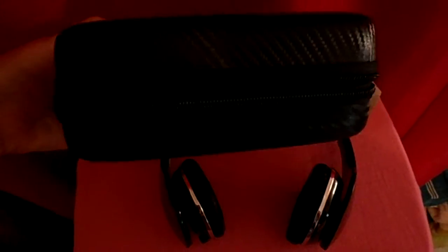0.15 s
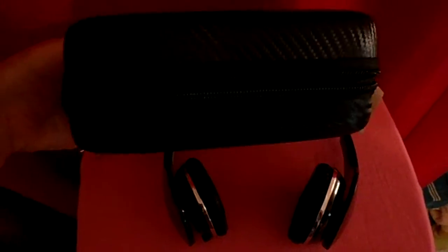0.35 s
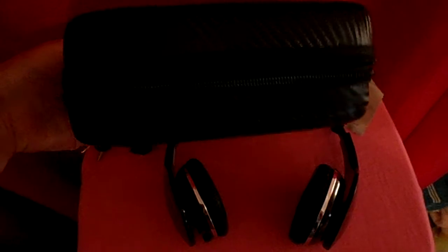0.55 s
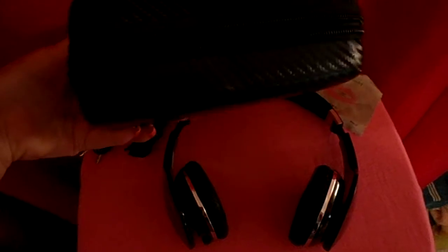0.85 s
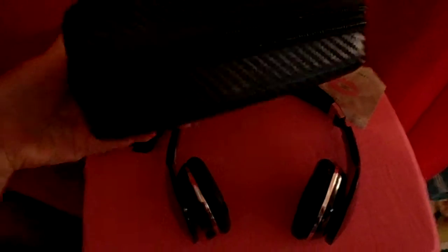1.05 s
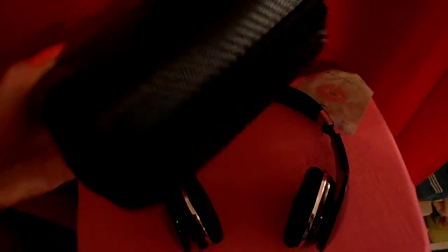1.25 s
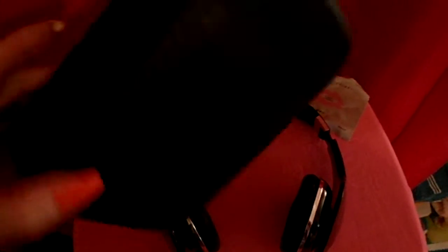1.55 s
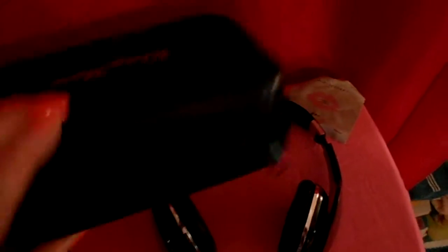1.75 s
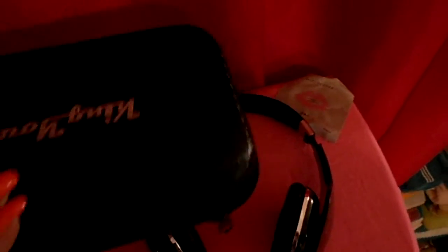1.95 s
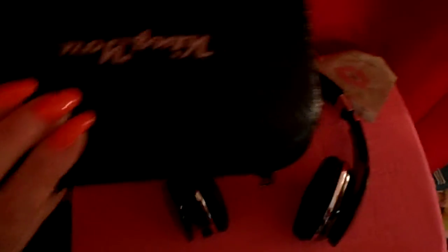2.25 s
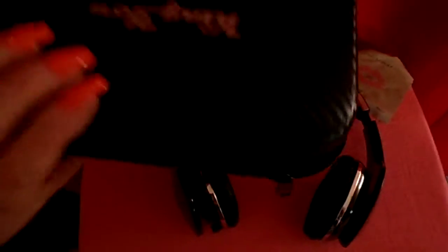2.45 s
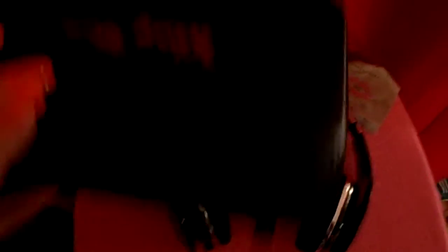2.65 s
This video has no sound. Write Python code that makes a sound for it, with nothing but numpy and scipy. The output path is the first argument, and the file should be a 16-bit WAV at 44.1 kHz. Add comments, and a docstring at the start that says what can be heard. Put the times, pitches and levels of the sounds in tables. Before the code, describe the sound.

A hard zippered case is handled close to the microphone: faint touches first, then a dense flurry of hollow knocks, clicks and a zipper jingle midway, thinning to sparse taps over low fan hum in a small room.

```python
"""Zippered case turned over in the hand

A hard-shell case is handled in a quiet room, over a low fan hum, rush and hiss (shaped noise, wavering
sines) and a faint pulsing electronic whine (gated tone plus its octave). Fingers rub the shell (noise
strokes, noise-driven modes) and knock it, and loose parts click (decaying modes plus noise bursts).
A metal zipper pull jingles (four damped sines); two soft low bumps are decaying sines.
"""
import sys
import numpy as np
from scipy import signal
from scipy.fft import rfft, irfft, next_fast_len
from scipy.io import wavfile
from scipy.ndimage import map_coordinates

SR = 44100
rng = np.random.default_rng(int(sys.argv[2]) if len(sys.argv) > 2 else 0)


def wav_record(signal):
    """Record a signal, one row per channel, as 16-bit PCM in the file named by sys.argv[1]."""
    frames = np.transpose(np.atleast_2d(signal))
    bounded = np.clip(frames, -1, 1)
    # unit amplitude maps onto the largest positive 16-bit level
    quanta = np.round(bounded * 32767).astype(np.int16)
    wavfile.write(sys.argv[1], SR, quanta)


N = 123479
TIME_S = np.arange(N) / SR
AGE_S = np.arange(SR // 3) / SR  # time since an event

# Room rush and hiss, relative spectrum: (frequency [Hz], density [dB per Hz])
AIR_SPECTRUM = [(15, -3), (35, -3), (80, -11.5), (130, -6.5), (190, -12.5), (290, -8), (460, -12),
                (650, -14.5), (850, -17.5), (1000, -11.5), (1150, -18.5), (1400, -20.5), (2000, -28.5),
                (3300, -31.5), (6000, -32.5), (10000, -32.5), (16000, -37)]
AIR_DB = -42.5
# Fan hum lines: (frequency [Hz], level [dB], width [Hz])
HUM_LINES = [(52.5, -53, 1.9), (120, -49, 1.24), (159.5, -62.5, 3), (236.2, -60.5, 1.75),
             (290.7, -61.5, 6.1)]
HUM_THROB_HZ, HUM_THROB_DB = 2.743, 2.5

WHINE_HZ, WHINE_DB, WHINE_OCTAVE_DB, WHINE_WAVER_DB = 7867, -58, -10, 1.5
WHINE_GATE_HZ, WHINE_GATE_CENTRE_S = 14.98, 0.0486
# Whine gate: (time [s], share of each cycle that it is on [0-1])
WHINE_DUTY = [(2.07, 0.6), (2.13, 0.74)]

# Soft low bumps of the hand: (time [s], level [dB])
BUMPS = [(2.40, -30.5), (2.462, -32)]
BUMP_HZ, BUMP_T60_S = 51.4, 0.14

# Fingers sliding on the shell:
# (start [s], length [s], hiss level [dB], hiss top [Hz], shell level [dB])
RUBS = [(0.016, 0.13, -56, 12000, -54), (1.163, 0.19, -48, 11000, -45.5), (1.423, .11, -38.5, 3980, -29.5),
        (1.666, 0.074, -60, 6000, -36.5), (1.714, 0.057, -41.5, 14000, -47),
        (1.857, 0.016, -41, 13400, -40), (1.872, .026, -44.5, 12000, -40),
        (1.976, 0.016, -42.5, 11000, -34.5), (2.087, 0.056, -36.5, 5100, -41.5),
        (2.273, 0.045, -47, 11000, -39.5)]
# Rub hiss spectrum: (frequency [Hz], gain [dB])
RUB_COLOUR = [(300, -28), (1200, -5), (2900, 3), (4200, -4), (6500, 2.5), (10000, 0.5), (13000, -6),
              (16000, -2.5)]
RUB_RISE_SHARE, RUB_ROUGH_DB = 0.17, 1.5

# Strikes of the zipper pull: (time [s], free ringing [s], then the level of each of four modes [dB])
JINGLES = [(.092, 0.0055, -44.5, -70, -70, -65), (1.3445, 0.0089, -29, -41, -55, -48),
           (1.453, 0.064, -22, -37.5, -17.5, -46), (1.466, 0.03, -46, -55, -41, -29.5),
           (1.547, 0.086, -41.5, -49, -53, -50), (1.582, 0.045, -42, -70, -65, -62),
           (1.7505, 0.0061, -39, -60, -55, -56), (2.11, .025, -41, -65, -60, -66)]
# Modes of the pull, swinging free: (frequency [Hz], t60 [s])
PULL_MODES = [(5535, .15), (7944, .35), (10745, .04), (13573, .13)]
PULL_STOP_T60_S = 0.032  # extra damping once it lies against the case
PULL_DRIFT_RAD = 0.52  # contact makes the ring slightly unsteady

# Knocks on the case: (time [s], thump level [dB], thump centre [Hz], clack level [dB],
# clack centre [Hz], tick level [dB], tick centre [Hz], tick width [octaves])
KNOCKS = [(.010, -39, 415.5, -66, 1192, -44, 10000, .4), (.092, -43, 450, -41, 1070, -48, 6000, 0.34),
          (0.695, -51, 450, -46, 1180, -47, 6500, .5), (0.97, -40, 446.5, -46, 2460, -38, 7000, 0.3),
          (1.015, -33.5, 434, -46, 1190, -50, 6100, .4), (1.178, -26.5, 407, -46, 1190, -62, 5850, 0.37),
          (1.3453, -33, 450, -41, 1080, -40.5, 8900, 0.93), (1.352, -40, 520, -38.5, 1270, -38, 6000, 0.82),
          (1.409, -27, 460, -40, 1140, -50, 6000, .4), (1.4257, -31, 450, -28.5, 1110, -38, 5550, 0.11),
          (1.4425, -23, 350, -22.5, 1780, -29, 7300, 0.33),
          (1.4527, -10, 380, -25.5, 2050, -15.5, 9500, 0.26),
          (1.4656, -31, 540, -22.5, 880, -32, 10000, .18), (1.473, -37, 446, -30.5, 1720, -29, 8450, .4),
          (1.512, -31.5, 460, -21.5, 2070, -24, 6400, .9), (1.527, -42, 450, -26.5, 1860, -36, 4930, 0.91),
          (1.546, -27, 493, -39, 1360, -39, 10800, 0.23), (1.5832, -29.5, 474, -37.5, 1320, -47, 5900, .15),
          (1.615, -31, 610, -38, 1820, -54, 6000, .4), (1.648, -57, 450, -44, 1200, -37, 9900, 0.57),
          (1.7117, -23, 455, -34, 1190, -27.5, 5800, 0.086), (1.7161, -28, 460, -26.5, 1190, -29, 7300, 1),
          (1.7208, -42, 470, -31, 1180, -42, 7000, .5), (1.7341, -21, 450, -34, 1530, -14, 9100, 0.66),
          (1.7471, -21.5, 446, -24.5, 1220, -34, 8000, 0.44), (1.756, -38, 484, -34, 1270, -46, 7000, .4),
          (1.775, -53, 450, -33, 1280, -60, 6000, .4), (1.792, -37.5, 447, -35.5, 1200, -58, 6000, .4),
          (1.858, -38, 480, -42, 1220, -33.5, 8900, 0.69), (1.881, -35, 477, -41.5, 1200, -38, 6950, 0.64),
          (1.9835, -33.5, 485, -39.5, 1210, -37, 7000, .5), (2.052, -35, 487, -40.5, 1240, -60, 6000, .4),
          (2.095, -54, 420, -35, 990, -31, 5900, .2), (2.1015, -44, 520, -29.5, 930, -34, 5850, 0.22),
          (2.1096, -53, 400, -32, 1240, -23, 5500, 0.56), (2.116, -53, 450, -32.5, 1240, -31, 5900, .25),
          (2.131, -34, 400, -38.5, 1100, -41, 6000, .2), (2.208, -36, 440, -42, 1470, -51, 6000, .4),
          (2.287, -32.5, 676, -44, 695, -58, 8000, 0.33), (2.578, -31.5, 413, -41, 1280, -58, 6000, .4),
          (2.782, -36.5, 430, -36.5, 1210, -51, 9000, .4)]
# Modes of the hollow shell before the pitch factor: (frequency [Hz])
SHELL_HZ = [285, 356, 400, 455, 573, 650, 800, 915, 1053, 1206, 1770]
# Ring of each shell mode, before strike position and hand damping: (level [dB], t60 [s])
SHELL_RING = [(-6.5, 0.08), (-0.5, 0.082), (-6.5, 0.051), (2, 0.099), (-1, 0.064), (-5, 0.031),
              (-4.5, 0.071), (-3, .08), (-13, .11), (1, 0.15), (-16, 0.098)]
# A firmer grip stiffens the shell: (time [s], pitch factor [ratio])
GRIP = [(1.5, 1.04), (1.7, 0.99), (2.0, 1.4), (2.15, 1)]
THUMP_ATTACK_S, THUMP_OCTAVES, THUMP_SKIRT = 0.00297, 0.33, 0.45
HAND_DAMPS_AFTER_S, HAND_T60_S = 0.024, 0.08  # the palm smothers the ring

# Clack spectrum: (frequency [Hz], gain [dB])
CLACK_COLOUR = [(2700, -8), (4000, -14), (16000, -22)]
CLACK_OCTAVES, CLACK_SKIRT = 0.32, 0.015
# t60 at the reference pitch; higher clacks die sooner by this exponent
CLACK_REF_T60_S, CLACK_REF_HZ, CLACK_SHORTENING = 0.03, 1190, 0.96
# Resonances of the small hard parts that tick: (frequency [Hz], gain [dB])
TICK_COLOUR = [(2500, 3), (4100, -7.5), (4800, -1), (5250, -3), (5950, -1.5), (6700, 2), (7900, -12.5),
               (8800, 2.5), (9700, -7), (10600, 2.5), (11700, -15), (12800, -15), (14200, -1), (15000, -7),
               (16000, -10)]
TICK_T60_S, TICK_SKIRT = 0.012, 0.035

ROOM_T60_S, ROOM_DB, ROOM_TOP_HZ = 0.27, -12.5, 1850
TOP_HZ = 16100


def amp(db):
    """Decibels to gain."""
    return 10 ** (np.asarray(db) / 20)


def unit(x):
    """Scale to rms 1."""
    return x / np.sqrt(np.mean(x ** 2) + 1e-20)


def fade(t_s, t60_s):
    """Exponential decay, -60 dB at t60."""
    return np.exp(-np.log(1000) * t_s / t60_s)


def curve(x, table):
    """Linear interpolation in a two-column table."""
    return np.interp(x, *np.transpose(table))


def add(track, start_s, x):
    """Mix x into the track at start_s."""
    part = track[max(round(start_s * SR), 0):][:len(x)]
    part += x[:len(part)]


def filtered(x, response):
    """Apply a zero-phase gain that is a function of frequency."""
    size = next_fast_len(len(x) + SR // 4)
    spectrum = rfft(x, size) * response(np.fft.rfftfreq(size, 1 / SR))
    return irfft(spectrum, size)[:len(x)]


def noise(points):
    """Noise of rms 1 with a (frequency [Hz], level [dB]) spectrum."""
    f_hz, db = np.transpose(points)

    def response(hz):
        return amp(np.interp(np.log(hz + 1), np.log(f_hz + 1), db))

    return unit(filtered(rng.standard_normal(N), response))


def wobble(knots_hz):
    """Smooth random curve through knots_hz normal draws a second."""
    return map_coordinates(rng.standard_normal(N // 8), [TIME_S * knots_hz], mode="wrap")


def bell(hz, centre_hz, octaves, skirt):
    """Hump on a log-frequency axis with a broad skirt."""
    away = (np.log2((hz + 1) / centre_hz) / octaves) ** 2
    return np.exp(-away / 2) + skirt / (1 + away / 20)


def background():
    """Fan and air: steady shaped noise, plus wandering hum lines that swell and sink together."""
    hum = np.zeros(N)
    for hz, db, width_hz in HUM_LINES:
        phase = 2 * np.pi * hz * TIME_S + 0.63 * wobble(2 * width_hz)
        line = np.sin(phase) * amp(1.3 * wobble(6.24))
        hum += amp(db) * unit(line)
    throb = amp(-HUM_THROB_DB * np.cos(2 * np.pi * HUM_THROB_HZ * TIME_S))
    return amp(AIR_DB) * noise(AIR_SPECTRUM) + hum * throb


def whine():
    """Thin electronic tone and its octave, gated on once a cycle with soft edges."""
    cycle = np.cos(2 * np.pi * WHINE_GATE_HZ * (TIME_S - WHINE_GATE_CENTRE_S))
    threshold = np.cos(np.pi * curve(TIME_S, WHINE_DUTY))
    gate = np.clip(0.5 + 10 * (cycle - threshold), 0, 1)
    phase = 2 * np.pi * WHINE_HZ * TIME_S
    tone = np.sqrt(2) * (np.sin(phase) + amp(WHINE_OCTAVE_DB) * np.sin(2 * phase))
    return amp(WHINE_DB + WHINE_WAVER_DB * wobble(12)) * gate * tone


def bumps():
    """Dull pushes as the grip changes: decaying low sines."""
    out = np.zeros(N)
    for time_s, db in BUMPS:
        add(out, time_s, amp(db) * np.sin(2 * np.pi * BUMP_HZ * AGE_S) * fade(AGE_S, BUMP_T60_S))
    return out


def shell_ring(centre_hz, pitch):
    """Hollow shell's modes, strongest near a centre set by where it is hit; peak 1."""
    ring = np.zeros(len(AGE_S))
    for hz, (db, t60_s) in zip(SHELL_HZ, SHELL_RING):
        level = amp(db) * bell(hz, centre_hz, THUMP_OCTAVES, THUMP_SKIRT)
        tone = np.sin(2 * np.pi * hz * pitch * (AGE_S - 2 * THUMP_ATTACK_S))
        ring += level * fade(AGE_S, t60_s) * tone
    hand = fade(np.maximum(AGE_S - HAND_DAMPS_AFTER_S, 0), HAND_T60_S)
    attack = 1 - np.exp(-(AGE_S / THUMP_ATTACK_S) ** 2)
    ring = ring * hand * attack
    return ring / np.abs(ring).max()


def rubs():
    """Skin catches on the textured shell: grainy hiss and a murmur of the shell's modes."""
    out = np.zeros(N)
    hiss = unit(noise(RUB_COLOUR) * amp(RUB_ROUGH_DB * wobble(900)))
    ring = shell_ring(centre_hz=482, pitch=1.02)
    murmur = unit(signal.fftconvolve(rng.standard_normal(N), ring)[:N])
    for start_s, length_s, hiss_db, top_hz, shell_db in RUBS:
        progress = (TIME_S - start_s) / length_s
        stroke = np.sqrt(np.interp(progress, [0, RUB_RISE_SHARE, 1], [0, 1, 0]))
        soft_hiss = filtered(hiss, lambda hz: 1 / np.sqrt(1 + (hz / top_hz) ** 10))
        out += stroke * (amp(hiss_db) * soft_hiss + amp(shell_db) * murmur)
    return out


def zipper_pull():
    """Metal tab's modes ring while it swings free and are damped when it falls back."""
    out = np.zeros(N)
    unsteady_rad = PULL_DRIFT_RAD * wobble(140)
    for time_s, free_s, *modes_db in JINGLES:
        drift_rad = np.roll(unsteady_rad, -round(time_s * SR))[:len(AGE_S)]
        ring = np.zeros(len(AGE_S))
        for (hz, t60_s), db in zip(PULL_MODES, modes_db):
            ring += amp(db) * fade(AGE_S, t60_s) * np.sin(2 * np.pi * hz * AGE_S + drift_rad)
        add(out, time_s, ring * fade(np.maximum(AGE_S - free_s, 0), PULL_STOP_T60_S))
    return out


def burst(centre_hz, octaves, skirt, t60_s, colour):
    """Many crowded, quickly dying resonances around a centre, as decaying shaped noise."""
    x = filtered(rng.standard_normal(len(AGE_S)),
                 lambda hz: bell(hz, centre_hz, octaves, skirt) * amp(curve(hz, colour)))
    shape = fade(AGE_S, t60_s) * (1 - np.exp(-AGE_S / 0.0001))
    return unit(x * shape) * np.sqrt(np.mean(shape ** 2)) / shape.max()


def knocks():
    """Each contact gives a sharp tick, a plastic clack and a hollow thump."""
    out = np.zeros(N)
    for time_s, thump_db, thump_hz, clack_db, clack_hz, tick_db, tick_hz, tick_octaves in KNOCKS:
        thump = shell_ring(thump_hz, curve(time_s, GRIP))
        clack_t60_s = CLACK_REF_T60_S * (CLACK_REF_HZ / clack_hz) ** CLACK_SHORTENING
        clack = burst(clack_hz, CLACK_OCTAVES, CLACK_SKIRT, clack_t60_s, CLACK_COLOUR)
        tick = burst(tick_hz, tick_octaves, TICK_SKIRT, TICK_T60_S, TICK_COLOUR)
        add(out, time_s, amp(thump_db) * thump + amp(clack_db) * clack + amp(tick_db) * tick)
    return out


def room_answer(case):
    """Diffuse reflections: convolution with a decaying noise tail, treble absorbed."""
    tail = rng.standard_normal(len(AGE_S)) * fade(AGE_S, ROOM_T60_S) * (1 - np.exp(-AGE_S / 0.012))
    room = signal.fftconvolve(case, tail / np.linalg.norm(tail))[:N]
    return amp(ROOM_DB) * filtered(room, lambda hz: 1 / np.sqrt(1 + (hz / ROOM_TOP_HZ) ** 2))


def scene():
    """The background, the bumps, and the case with a faint answer from the room."""
    case = rubs() + zipper_pull() + knocks()
    return (background() + whine() + bumps() + case + room_answer(case))[None]


def record(dry):
    """Remove everything from the band limit up."""
    return filtered(dry[0], lambda hz: hz < TOP_HZ)[None]


dry = scene()
out = record(dry)
wav_record(out)
```